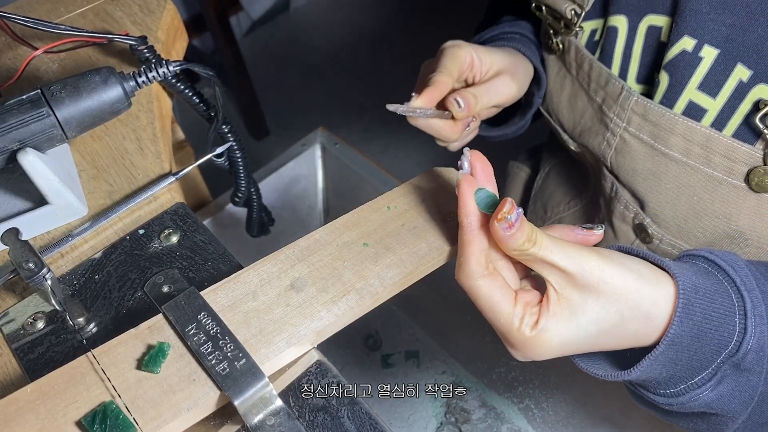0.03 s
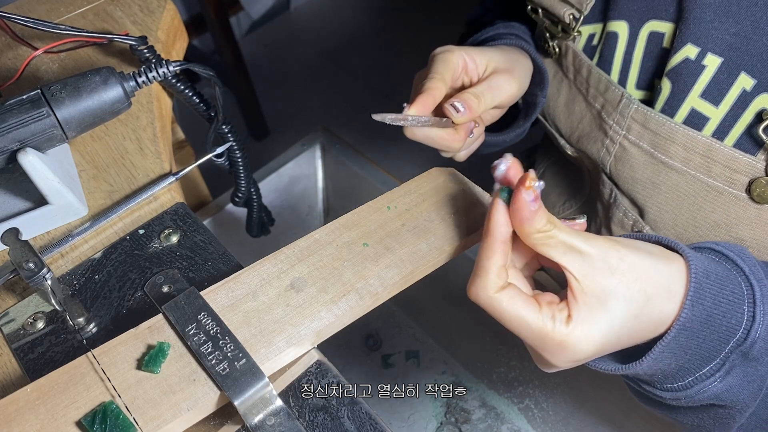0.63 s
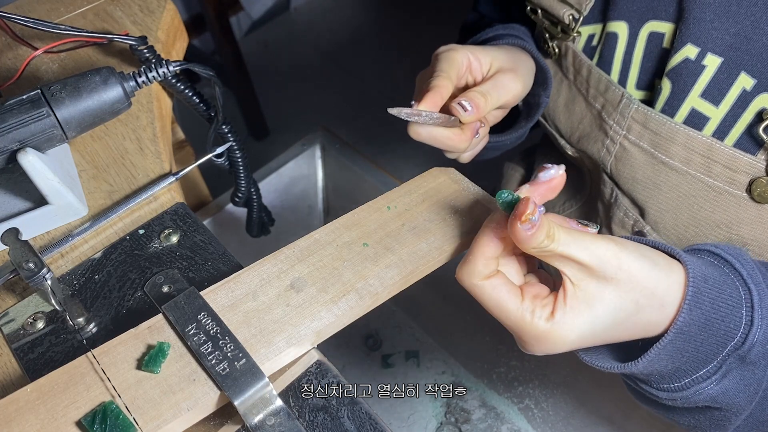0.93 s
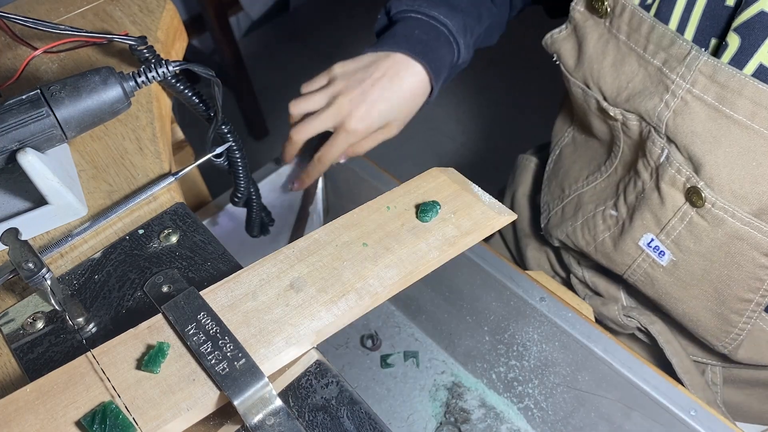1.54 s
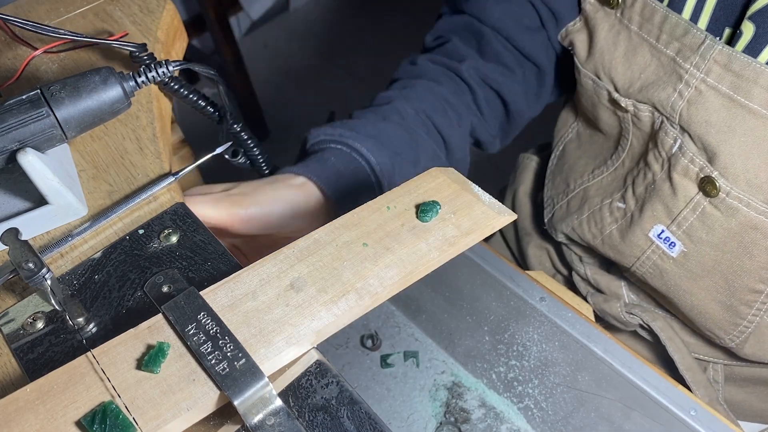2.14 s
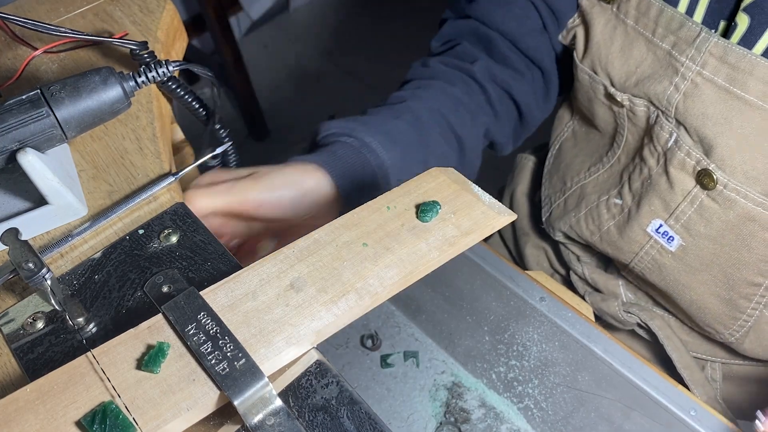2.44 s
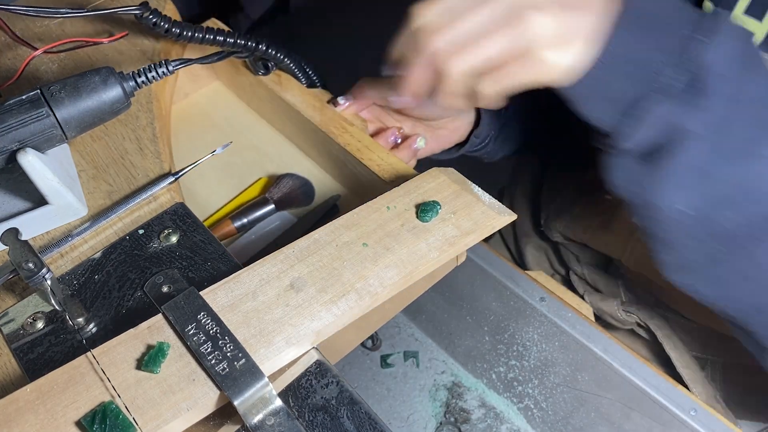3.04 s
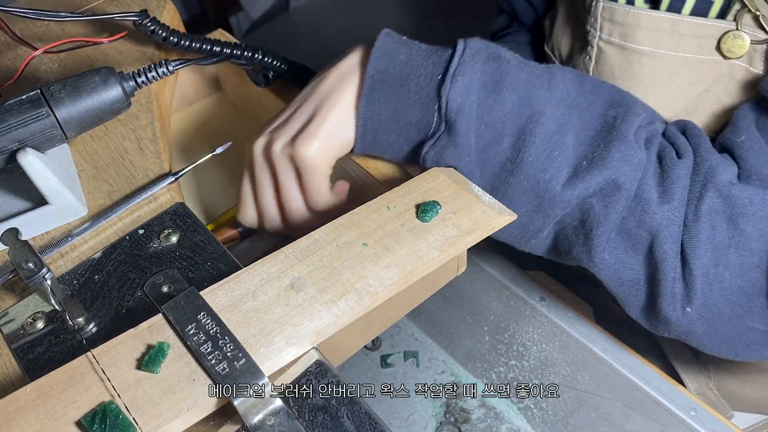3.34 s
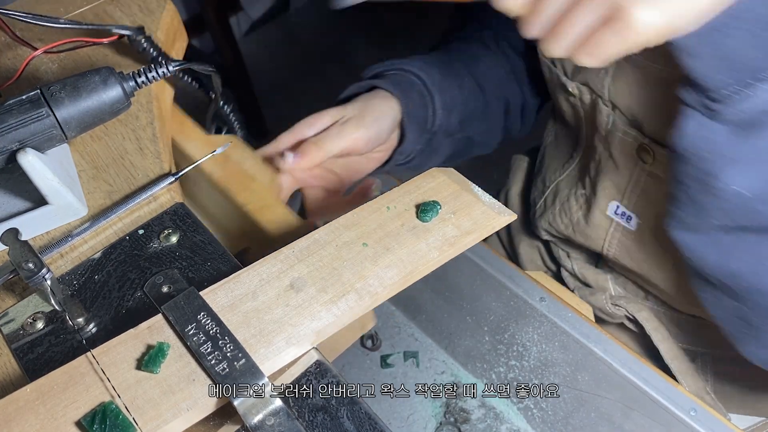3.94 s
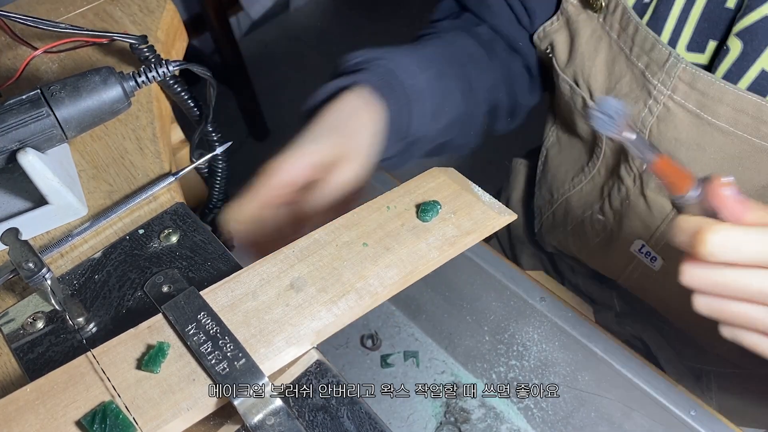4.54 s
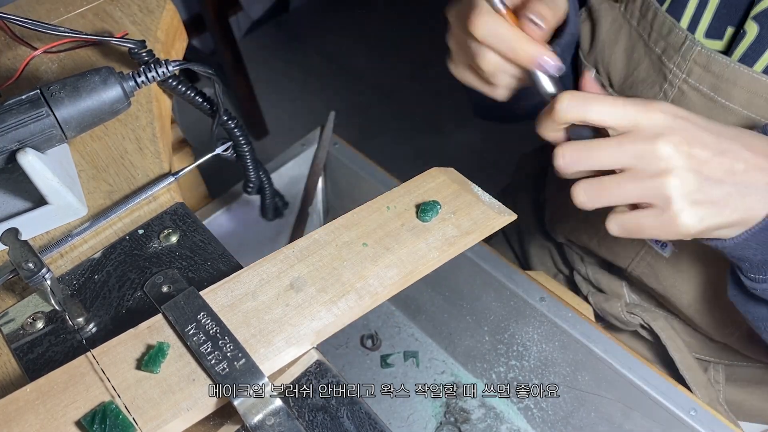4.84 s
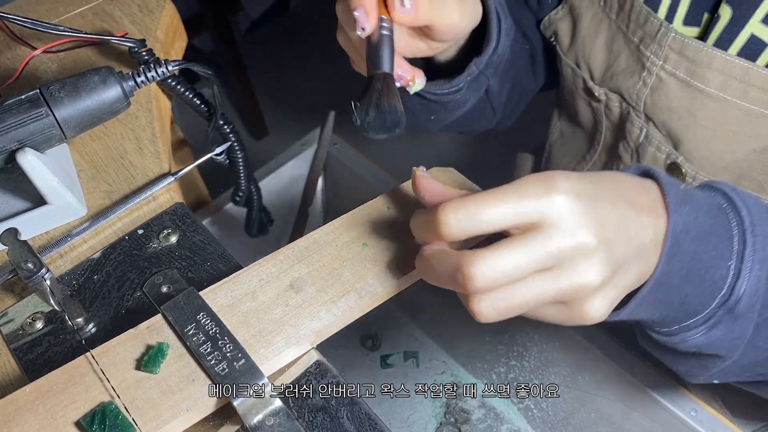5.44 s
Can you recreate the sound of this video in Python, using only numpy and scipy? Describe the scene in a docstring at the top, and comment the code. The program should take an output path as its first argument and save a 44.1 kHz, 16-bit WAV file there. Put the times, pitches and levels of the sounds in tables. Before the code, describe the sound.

Light knocks on a wooden bench, then a wooden drawer rasps open, groans and bumps shut in a quiet workshop.

```python
"""A jeweller's bench in a small, quiet room, heard through two close microphones.
Sleeves rustle over a low rumble. Carving wax is set on the wooden bench pin, and a file is slid
away and dropped. A wooden drawer rasps open: its dry runners catch and slip, which shakes the
box and makes it groan. A brush clinks as it is picked out, the drawer bumps shut, and
fingertips turn the brush."""
import sys
import numpy as np
from scipy import signal
from scipy.fft import rfft, irfft, next_fast_len
from scipy.io import wavfile
from scipy.ndimage import uniform_filter1d, map_coordinates

SR = 44100
rng = np.random.default_rng(int(sys.argv[2]) if len(sys.argv) > 2 else 0)


def pcm_store(signal):
    """Save signal as 16-bit PCM."""
    levels = np.round(np.clip(np.atleast_2d(signal), -1, 1) * 32767)
    wavfile.write(sys.argv[1], SR, levels.astype(np.int16).T)


N = 250488


def amp(db):
    """Turn decibels into a gain."""
    return 10 ** (np.asarray(db) / 20)

def unit(x):
    """Scale a signal to an average power of 1."""
    return x / np.sqrt(np.mean(x ** 2) + 1e-20)

def along(points, hz):
    """Read a curve of (f/Hz, value) points, giving each octave about equal space."""
    f, v = np.transpose(points)
    return np.interp(np.log(hz + 1), np.log(f + 1), v)

def level(rows):
    """Join (t/s, level/dB) points into one level per sample, silent before and after."""
    s, db = np.transpose(rows)
    return np.interp(np.arange(N) / SR, s, db, left=-160, right=-160)

def swell(middle, length, db):
    """A gain that rises and falls smoothly, once."""
    return amp(db) * np.exp(-(2 * (np.arange(N) / SR - middle) / length) ** 2)

def wobble(rate):
    """A smooth curve through `rate` random values a second."""
    return map_coordinates(rng.standard_normal(int(N * rate / SR) + 4), [np.arange(N) * rate / SR])

def add(track, s, sound):
    """Mix a sound in, starting at s seconds."""
    part = track[:, round(s * SR):][:, :sound.shape[-1]]
    part += sound[..., :part.shape[1]]

def filtered(x, response):
    """Multiply each frequency in x by response(hz)."""
    size = next_fast_len(N + SR // 2)
    return irfft(rfft(x, size) * response(np.fft.rfftfreq(size, 1 / SR)), size)[..., :N]

def coloured(x, points):
    """Give x a tone colour: (f/Hz, level/dB) points set the balance of low and high."""
    size = 8192
    gains = unit(amp(along(points, np.fft.rfftfreq(size, 1 / SR))))
    cepstrum = irfft(np.log(gains))
    cepstrum[1:size // 2] *= 2  # folded so the filter never sounds before its input
    cepstrum[size // 2 + 1:] = 0
    impulse = irfft(np.exp(rfft(cepstrum)))
    return signal.fftconvolve(x, impulse[None], axes=1)[:, :N]

def resonant(x, modes):
    """Pass x through resonances, the notes an object favours: (f/Hz, width/Hz, level/dB)."""
    def response(f):
        total = sum((-1) ** k * amp(db) * 1j * f * width / (hz * hz - f * f + 1j * f * width)
                    * hz / (hz + 1j * f) for k, (hz, width, db) in enumerate(modes))
        return total / np.sqrt(np.mean(np.abs(total) ** 2))
    return filtered(x, response)

def rung(force, hz, t60):
    """A force rings one note, which fades by 60 dB in t60 seconds."""
    t = np.arange(SR // 8) / SR
    ring = np.sin(2 * np.pi * hz * t) * amp(-60 * t / t60)
    return signal.fftconvolve(force, ring[None] / np.linalg.norm(ring), axes=1)

def struck(modes, force):
    """A blow rings several fading notes at once: (f/Hz, level/dB, t60/s)."""
    t = np.arange(SR // 4) / SR
    ring = sum(amp(db + rng.normal(0, 0.85) - 60 * t / t60) * np.sin(2 * np.pi * hz * t)
               for hz, db, t60 in modes)
    return signal.fftconvolve(ring[None], force, axes=1)

def wandering(x, drift, rate):
    """Let the pitch stray by about the fraction `drift`, `rate` times a second."""
    n = np.arange(N)
    bend = drift * wobble(rate)
    position = n + np.cumsum(bend - uniform_filter1d(bend, size=SR // 4))
    return np.array([np.interp(position, n, side) for side in x])

def bass_cut(x, low_hz=82):
    """Remove almost all deep bass."""
    return signal.sosfilt(signal.butter(4, low_hz, "highpass", fs=SR, output="sos"), x)

# how much left and right differ: f/Hz, level/dB
STEREO_WIDTH = [(60, -17), (150, -17), (300, -7.5), (470, -4.5), (700, -2), (1200, -1.5), (1550, 1),
                (2000, -2.5), (5000, -2)]
def diffuse(pair):
    """Turn two unrelated signals into left and right: alike in the bass, unlike above."""
    size = pair.shape[1]
    side = irfft(rfft(pair[1]) * amp(along(STEREO_WIDTH, np.fft.rfftfreq(size, 1 / SR))), size)
    return np.array([pair[0] + side, pair[0] - side])

def slips(rate, spread_db, smooth, scatter_t60=0.018, apart=0.65):
    """The force of rubbing: tiny, uneven slips over a smooth rub, scattered sideways by the wood."""
    slipping = rng.random((2, N)) < rate / SR
    size, rub = rng.standard_normal((2, 2, N))
    grains = slipping * amp(spread_db * np.clip(size, -2, 2)) * np.sign(rub)
    near, far = unit(unit(grains) + smooth * rub)
    t = np.arange(SR // 40) / SR
    paths = rng.standard_normal(len(t)) * amp(-60 * t / scatter_t60)
    scattered = unit(signal.fftconvolve(near, paths)[:N])
    return diffuse(np.array([near, unit(scattered + apart * far)]))

def contact(t60, chatter):
    """The force of one blow: a sharp push, then chatter spreading through the wood."""
    t = np.arange(SR // 4) / SR
    rattle = diffuse(rng.standard_normal((2, len(t)))) * amp(-60 * t / t60)
    force = chatter * rattle / np.linalg.norm(rattle[0])
    force[:, 0] += 1
    return force / np.linalg.norm(force[0])

def catches(rows):
    """Noise rings one narrow resonance after another, each swelling briefly."""
    out, t = np.zeros((2, N)), np.arange(SR // 3) / SR
    centre = t.mean()
    for s, length, db, hz, width in rows:
        noise = diffuse(rng.standard_normal((2, len(t))))
        rasp = rung(noise, hz, t60=np.log(1000) / (np.pi * width))[:, :len(t)]
        shape = np.exp(-(2 * (t - centre) / length) ** 2)
        add(out, s - centre, amp(db) * unit(rasp * shape) * np.sqrt(np.mean(shape ** 2)))
    return out


# tone colour of the quiet room: f/Hz, level/dB
ROOM_COLOUR = [(22, -18.5), (40, -17.5), (56, 3.5), (80, -14.5), (110, -10), (170, -22), (250, -27.5),
               (400, -35.5), (950, -44), (1300, -48), (1600, -43), (2100, -52.5), (2900, -50.5),
               (3400, -57), (10000, -60), (15000, -74)]
def room_rumble(level_db=-56.5):
    """The workshop's steady, low rumble."""
    noise = diffuse(rng.standard_normal((2, N)))
    return amp(level_db) * unit(filtered(noise, lambda hz: amp(along(ROOM_COLOUR, hz))))

# how long the echo takes to fade: f/Hz, t60/s
ECHO_FADE = [(100, 0.7), (260, 0.38), (700, 0.33), (2000, 0.3), (6000, 0.29), (14000, 0.21)]
def room_echo(x):
    """The room answers a few milliseconds later, and the bass lingers longest."""
    hz, t, spectrum = signal.stft(rng.standard_normal((2, SR * 2 // 3)), SR, nperseg=256)
    fade = amp(-60 * t / along(ECHO_FADE, hz)[:, None])
    tail = signal.istft(spectrum * fade, SR, nperseg=256)[1]
    tail = diffuse(tail / np.linalg.norm(tail[0]))
    delayed = np.pad(tail, ((0, 0), (200, 0)))
    return signal.fftconvolve(x, delayed, axes=1)[:, :N]

# arm movements, the last as the fingers land on the brush: middle t/s, length/s, level/dB
RUSTLES = [(0.368, 0.18, -77), (1.78, 0.42, -59.5), (2.268, 0.072, -61.5), (3.134, 0.55, -61),
           (3.566, 0.15, -58), (4.936, 0.32, -67.5), (5.204, 0.13, -74.5)]
# tone colour of cloth: f/Hz, level/dB
CLOTH = [(120, -20.5), (280, 4.5), (480, 4.5), (900, -6.5), (1700, -8.5), (2300, -12.5), (3500, -18.5),
         (6000, -22.5), (11000, -22), (16000, -30)]
def sleeves():
    """Cloth brushes on cloth as the arms move, and softly as the fingers land on the brush."""
    rustle = sum(swell(*row) for row in RUSTLES)
    return amp(-1) * coloured(rustle * slips(rate=370, spread_db=2, smooth=0.73), CLOTH)

# how hard the fingers rub the brush handle: t/s, level/dB
FINGER_RUB = [(4.768, -98), (4.778, -72), (4.85, -81), (4.925, -74), (4.944, -68.5), (4.965, -71),
              (4.985, -84.5), (5.05, -94)]
# tone colour of dry skin: f/Hz, level/dB
SKIN = [(300, 3), (900, 7), (1600, 4), (2300, 0), (3500, 1), (5000, -11), (6000, -25), (14000, -33)]
def fingers():
    """Dry fingertips catch in tiny grains as they turn the brush."""
    return coloured(amp(level(FINGER_RUB)) * slips(rate=370, spread_db=2.5, smooth=0.39), SKIN)

# two squeaks, then two notes of a tap: middle t/s, length/s, level/dB, f/Hz, width/Hz
SQUEAKS_AND_TAP = [(.352, 0.041, -75.5, 2946, 13), (.4, 0.044, -77, 1560, 65), (.512, 0.019, -67, 1240, 30),
                   (.53, 0.022, -62.5, 872, 25)]
def squeaks_and_tap():
    """Faint squeaks on the wax, then the brief ring of a soft tap."""
    return catches(SQUEAKS_AND_TAP)

# how hard the file rubs: t/s, level/dB
FILE_RUB = [(1.315, -40), (1.321, -52), (1.359, -48), (1.45, -40.5), (1.485, -37.5), (1.525, -41.5),
            (1.6, -52), (1.68, -94)]
# tone colours of a tool rubbing wood and of its fine scraping: f/Hz, level/dB
TOOL_RUB = [(100, -27), (220, -5), (280, 9.5), (370, -13.5), (470, 1), (850, -0.5), (1200, -11),
            (1600, -4.5), (2000, -25), (3000, -20.5), (9000, -75)]
SCRAPE = [(1200, -22), (2400, -5.5), (3500, -7.5), (5000, -7), (7000, -14), (11000, -16.5), (16000, -21)]
def file_slide():
    """The file is pushed along wood, its teeth lightly scraping."""
    force = amp(level(FILE_RUB)) * slips(rate=2100, spread_db=4.5, smooth=0.25)
    return coloured(force, TOOL_RUB) + amp(-25) * coloured(force, SCRAPE)

# the file landing: t/s, level/dB
DROP = (1.862, -36)
# notes of what rings under it: f/Hz, level/dB, t60/s
LANDING_NOTES = [(320, 9.5, .14), (398, 19, .06), (885, 6.5, .065), (1190, -2.5, 0.17), (1570, 8.5, .04),
                 (1987, 0, 0.17), (2550, -1, .07)]
def file_drop():
    """The dropped file leaves a short, woody ring."""
    out, (s, db) = np.zeros((2, N)), DROP
    add(out, s, amp(db) * struck(LANDING_NOTES, contact(t60=0.004, chatter=0.4)))
    return out

# knocks of wax, file, brush and fingers on the bench, tray and drawer (later dB add to the level):
# t/s, level/dB, crack/dB, tick/dB, chatter t60/s, ring f/Hz, ring/dB, thud/dB
KNOCKS = [(.5, -52, -35, -35, .07, 754, 4.5, -2), (0.832, -52, -24, -30, 0.15, 2120, -4.5, -5),
          (1.093, -22, -7, -11, 0.15, 1000, -4.5, -1), (1.102, -27, -20, -35, .04, 450, 5, -8),
          (1.32, -31, -11, 4.5, .03, 504, 6.5, -4), (1.371, -36.5, -5, -20, 0.076, 980, 5, 4.5),
          (1.469, -24, -14, -25, 0.056, 840, -3, -6), (1.483, -25.5, -19, -28, 0.03, 605, -2, -1),
          (1.540, -25, -9, -14, 0.063, 1140, -6, -4.5), (1.796, -40, -1, -3, 0.029, 2250, -4.5, -12.5),
          (1.862, -19, -0.5, -3, 0.016, 333, 0.5, -17), (1.894, -24.5, -25, -30, 0.016, 163, 7, 4),
          (1.929, -31, -7, 1, 0.032, 457, -5, -4.5), (1.978, -37, -32, -35, 0.028, 180, 7, 0.5),
          (2.041, -48.5, 0.5, -12, 0.036, 2490, -6.5, 0.5), (2.171, -40, -20, -35, .025, 563, 2.5, 0.5),
          (2.832, -33.5, -7, 11, 0.025, 1540, -4.5, -2), (3.258, -21, -9, 0, 0.07, 860, -1.5, -2),
          (3.307, -26, -30, -35, 0.055, 330, 3.5, 1), (3.421, -38.5, 3, -3, 0.057, 890, 0.5, 3),
          (3.539, -48, -10, -28, .04, 1880, -3, -9.5), (3.596, -34.5, -2, -16, 0.075, 520, 3.5, -11),
          (4.64, -60, -2, 6.5, .023, 3580, -1.5, -3), (5.109, -45, -11, 3, 0.019, 217.5, 7.5, -2),
          (5.116, -48, -29, -24, .02, 452, 6, 1.5)]
# resonances of the bench's top and of its frame: f/Hz, width/Hz, level/dB
BENCH_TOP = [(302, 26, 4), (506, 60, 4), (794, 96, 0.5), (1080, 120, -18), (1465, 161.4, -27),
             (2160, 400, -10.5), (2600, 89, -5.5)]
FRAME = [(104, 40, -13), (142, 20, 2.5), (182, 18, 4.5), (250, 50, -7), (293, 30, -5.5)]
# tone colours of a blow on wood, from dull to bright: f/Hz, level/dB
THUD = [(35, -42), (90, -0.5), (170, 1), (280, -1), (420, -19.5), (1000, -67.5), (3000, -110)]
WOOD = [(130, -26.5), (300, 5.5), (500, 5.5), (900, -2), (1600, -11), (2400, -30), (5000, -54.5),
        (10000, -85.5)]
CRACK = [(1000, -20), (2000, -0.5), (2600, -2), (3400, -10.5), (5300, -14.5), (7000, -26.5), (9000, -31),
         (16000, -39)]
def knocks(ring_cycles=9):
    """Knocks on the bench, tray and drawer: all thud, hard ones crack, each spot has its note."""
    body, thud, crack, spot = np.zeros((4, 2, N))
    for s, db, crack_db, _, t60, hz, ring_db, thud_db in KNOCKS:
        force = contact(t60, chatter=2.9)
        add(body, s, amp(db) * force)
        add(thud, s, amp(db + thud_db) * force)
        add(crack, s, amp(db + crack_db) * contact(t60, chatter=3.7))
        add(spot, s, amp(db + ring_db) * rung(force, hz, ring_cycles / hz))
    wood = amp(18) * coloured(body, WOOD) + amp(5) * resonant(body, BENCH_TOP) + amp(16.5) * spot
    low = amp(12.5) * coloured(thud, THUD) + resonant(thud, FRAME)
    return wood + low + amp(15.5) * coloured(crack, CRACK)

# tone colour of a tick: f/Hz, level/dB
TICK = [(2500, -12), (5000, -6), (6700, 4), (9000, 2.5), (11500, -12.5), (16000, -36)]
def ticks():
    """The first touch of every knock is a crisp, dry tick."""
    force = np.zeros((2, N))
    for s, db, _, tick_db, *_ in KNOCKS:
        add(force, s, amp(db + tick_db) * contact(t60=0.027, chatter=0.68))
    return coloured(force, TICK)

# the brush hitting other tools: t/s, level/dB
CLINKS = [(3.259, -37), (3.6653, -33)]
# notes of its handle: f/Hz, level/dB, t60/s
HANDLE_NOTES = [(1504, 8, 0.035), (2896, -1, 0.025), (4850, 8, 0.03), (6700, 3, 0.016), (8800, 2, 0.014),
                (10820, -1, 0.016)]
# its drag over the drawer's bottom and its scuff on the edge: middle t/s, length/s, level/dB
DRAG = (3.364, 0.024, -32.5)
SCUFF = (3.428, .02, -44.5)
def brush():
    """The handle rings at each touch, scrapes the drawer's bottom and scuffs its edge going out."""
    clinks = np.zeros((2, N))
    for s, db in CLINKS:
        add(clinks, s, amp(db - 4) * struck(HANDLE_NOTES, contact(t60=0.038, chatter=0.98)))
        add(clinks, s, amp(db - 9) * contact(t60=0.018, chatter=2.5))
    force = slips(rate=1400, spread_db=-4, smooth=1)
    drag, scuff = swell(*DRAG) * force, swell(*SCUFF) * force
    # a note that rings longer makes a narrower, taller resonance
    modes = [(hz, np.log(1000) / (np.pi * t60), db + 20 * np.log10(t60)) for hz, db, t60 in HANDLE_NOTES]
    handle = amp(-11) * resonant(drag, modes)
    bottom = amp(-6.5) * resonant(drag, PANEL)
    scrape = amp(1) * coloured(drag, TOOL_RUB) + amp(-21) * coloured(drag, SCRAPE)
    edge = coloured(scuff, SCRAPE) + amp(-22) * coloured(scuff, TICK)
    return clinks + handle + bottom + scrape + edge

# the drawer's bumps (thud and ring are added to the level): t/s, level/dB, thud/dB, f/Hz, ring/dB
JOLTS = [(2.371, -18, 13.5, 172, 18), (2.436, -17, 7.5, 202, 19), (2.591, -22.5, 2.5, 1115, 10),
         (2.61, -18.5, 3.5, 540, 14.5), (2.641, -10, -2.5, 710, 20.5), (2.65, -13, 3, 330, 17),
         (2.707, -11.5, -1.5, 700, 12.5), (2.847, -22.5, -1.5, 265, 28.5), (3.662, -13, 3, 296, 22),
         (3.668, -11, 3, 840, 17), (3.675, -15, 8.5, 306, 13), (3.838, -14, 1, 333, 19.5),
         (3.87, -8.5, 2, 720, 11), (3.897, -14, 10.5, 178, 22.5), (4.001, -19, 8, 180, 19),
         (4.054, -20.5, 5.5, 190, 14.5), (4.149, -22.5, 8, 247, 12), (4.287, -28.5, 19.5, 252, 13),
         (4.346, -22.5, 12.5, 180, 23), (4.365, -19.5, 3, 656, 11), (4.394, -21, 13, 850, 8)]
def drawer_jolts(ring_cycles=8):
    """The loose drawer tips and bumps against its frame, each corner with its own note."""
    body, thud, corner = np.zeros((3, 2, N))
    for s, db, thud_db, hz, ring_db in JOLTS:
        force = contact(t60=0.016, chatter=2)
        add(body, s, amp(db) * force)
        add(thud, s, amp(db + thud_db) * force)
        ring = rung(contact(t60=0.017, chatter=0.99), hz, ring_cycles / hz)
        add(corner, s, amp(db + ring_db) * ring)
    wood = amp(10.5) * coloured(body, WOOD) + amp(3.5) * resonant(body, BOX)
    return wood + coloured(thud, THUD) + corner

# groans of the sticking drawer: middle t/s, length/s, level/dB
GROANS = [(2.755, .05, -25), (2.827, 0.068, -15), (3.77, 0.076, -24.5), (3.913, 0.093, -21.5),
          (4.095, 0.026, -26), (4.141, 0.049, -27.5), (4.207, 0.033, -30), (4.324, .035, -30.5),
          (4.394, 0.033, -32.5)]
def drawer_groan(pitch_hz=464, waver=0.022, rough_db=2):
    """Now and then the slipping locks onto the box's main note, most of all as the pull slows."""
    phase = 2 * np.pi * np.cumsum(pitch_hz * (1 + waver * wobble(70))) / SR
    wave = np.sin(phase) + amp(-26) * np.sin(2 * phase)
    roughness = unit(amp(rough_db * wobble(170)))
    return sum(swell(*row) for row in GROANS) * wave * roughness

# brief notes in the drawer's rasp: middle t/s, length/s, level/dB, f/Hz, width/Hz
RASP_NOTES = [(2.44, 0.066, -37, 2867, 110), (2.497, 0.031, -29, 1610, 130), (2.505, .05, -34, 2150, 107),
              (2.525, .035, -41.5, 5100, 200), (2.54, .05, -31, 720, 120), (2.595, 0.029, -38, 2910, 90),
              (2.597, 0.033, -32, 1600, 70), (2.69, 0.039, -22.5, 1620, 60.1),
              (2.745, 0.08, -34.5, 1720, 69.9), (2.768, 0.051, -37.5, 2892, 70),
              (2.795, 0.075, -30, 1552, 49.84), (3.8, 0.038, -33, 1700, 70),
              (3.828, 0.032, -25.5, 845, 40.1), (3.88, 0.035, -31.5, 1144, 91), (3.99, .1, -33, 1059, 35),
              (4.12, 0.067, -42, 2120, 160), (4.245, 0.056, -46.5, 2860, 129),
              (4.375, 0.073, -52, 2900, 161)]
def drawer_catches():
    """The rasping drawer catches on one resonance after another."""
    return catches(RASP_NOTES)

# resonances of the runners: f/Hz, width/Hz, pulled level/dB, pushed level/dB
RUNNERS = [(2230, 150, -14.5, -10.5), (2860, 90, -8, -8.5), (3390, 110, -20.5, -27),
           (4370, 100, -19.5, -16), (4760, 100, -20.5, -17.5), (5030, 300, -10, -16)]
def runners(pull, push, swing_db=5, rate=22):
    """Each resonance of the runners swells and fades on its own as the touching point travels."""
    out = np.zeros((2, N))
    for hz, width, pull_db, push_db in RUNNERS:
        swing = unit(amp(swing_db * wobble(rate)))
        out += swing * resonant(amp(pull_db) * pull + amp(push_db) * push, [(hz, width, 0)])
    return out

# friction as the drawer is pulled out, then pushed in: t/s, level/dB
PULL = [(2.303, -76.5), (2.328, -47.5), (2.423, -42.5), (2.429, -41), (2.571, -35.5), (2.579, -36),
        (2.747, -40), (2.775, -40), (2.87, -61)]
PUSH = [(3.56, -74.5), (3.606, -58), (3.63, -63), (3.65, -51.5), (3.663, -45.5), (3.678, -45.5),
        (3.826, -42.5), (4.038, -43), (4.206, -50.5), (4.393, -49.5), (4.451, -65.5)]
def stroke_gains(response, steady_db=-40.5):
    """A gain for the pull and one for the push, set by friction and by how far the drawer is open."""
    pull_db, push_db, open_db, growth = response
    stroke_times = [PULL[0][0], PULL[-1][0], PUSH[0][0], PUSH[-1][0]]
    opening = np.interp(np.arange(N) / SR, stroke_times, [0, 1, 1, 0])
    strokes = [db + growth * (level(rows) - steady_db) + open_db * opening
               for db, rows in [(pull_db, PULL), (push_db, PUSH)]]
    return uniform_filter1d(amp(strokes), size=300)

# how rub, judder and hiss follow the slide: pull/dB, push/dB, change when open/dB, dB per friction dB
RUB_RESPONSE = (-28.5, -29, 6, 1)
JUDDER_RESPONSE = (-42, -43.5, 13, 1.7)
HISS_RESPONSE = (-40.5, -36.5, -2.5, 1.5252)
# rumble as the drawer rides loose or snug in its frame: t/s, level/dB
DRAWER_RUMBLE = [(2.27, -44.5), (2.36, -43.5), (2.385, -27.5), (2.45, -35.5), (2.51, -44.5), (2.6, -32),
                 (2.67, -37.5), (2.75, -45), (2.87, -40.5), (2.95, -70.5), (3.63, -80), (3.66, -53),
                 (3.74, -42), (3.77, -51), (3.82, -36), (3.9, -30), (4.0, -33.5), (4.2, -43), (4.42, -43),
                 (4.5, -62)]
# resonances of the drawer's box and of its thin bottom panel: f/Hz, width/Hz, level/dB
BOX = [(293.7, 32, -7), (373.6, 19, -2), (452, 26, 0), (562, 60, -9), (617.6, 22, -2.5), (885, 71, -13),
       (1071, 17, -8), (1182.5, 16, -16.5)]
PANEL = [(1411, 76, -18), (1557, 94, 6.5), (1792, 62, 3.5), (2160, 260, -15)]
# tone colours of wood sliding on wood, low and high: f/Hz, level/dB
RUB = [(120, -40.5), (280, -9.5), (450, 1), (750, 1), (1100, -3.5), (1400, -8.5), (2200, -20.5),
       (5000, -65), (10000, -100)]
HISS = [(700, -39), (1300, 3), (2200, 2.5), (3000, -0.5), (3700, -4), (5500, -9), (7500, -4.5),
        (11000, -8.5), (14000, -9.5), (16000, -20)]
def drawer_slide(pull_boom_db=-5, push_boom_db=-1.5, lurch_db=3, shudder_db=2):
    """Dry runners catch and slip, shaking the frame, the box, its bottom panel and themselves."""
    pull_rub, push_rub = stroke_gains(RUB_RESPONSE)
    pull_hiss, push_hiss = stroke_gains(HISS_RESPONSE)
    rub, hiss = pull_rub + push_rub, pull_hiss + push_hiss
    rumble = amp(level(DRAWER_RUMBLE)) * unit(amp(lurch_db * wobble(35)))  # the loose drawer lurches
    judder = stroke_gains(JUDDER_RESPONSE).sum(axis=0) * unit(amp(shudder_db * wobble(40)))
    boom = amp(pull_boom_db) * pull_rub + amp(push_boom_db) * push_rub  # pushing loads the box harder
    boom *= unit(amp(2.1 * wobble(28)))  # the box rocks unevenly
    grip = unit(amp(0.82 * wobble(80)))  # the wood's grain varies the grip
    coarse = grip * slips(rate=800, spread_db=3, smooth=0.39)
    fine = grip * slips(rate=1100, spread_db=2.5, smooth=1)
    frame = resonant(rumble * coarse, FRAME) + amp(-11) * coloured(rumble * fine, THUD)
    box = wandering(resonant(boom * coarse, BOX), drift=0.028, rate=14)
    panel = wandering(resonant(judder * coarse, PANEL), drift=0.018, rate=18)  # its load shifts
    rasp = wandering(runners(pull_hiss * coarse, push_hiss * coarse), drift=0.016, rate=18)
    rubbing = amp(-7.5) * coloured(rub * fine, RUB) + amp(-1.04) * coloured(hiss * fine, HISS)
    return frame + box + amp(-2) * panel + rasp + rubbing


def scene():
    """Everything is within arm's reach in one small room; the groan has the least echo."""
    drawer = bass_cut(drawer_slide() + drawer_jolts()) + drawer_catches()
    handling = bass_cut(knocks(), low_hz=62) + file_slide() + sleeves() + fingers() + squeaks_and_tap()
    # sound, direct level/dB, level sent to the echo/dB
    layers = [(drawer, -0.5, -8.5), (handling, -3, -7), (drawer_groan(), 0, -17.5),
              (brush() + file_drop(), -4.5, -13.5), (ticks(), 0, -7)]
    direct = sum(amp(db) * sound for sound, db, _ in layers)
    echo = room_echo(sum(amp(db) * sound for sound, _, db in layers))
    return direct + echo + room_rumble()

# how much louder the left microphone's own sound is than the right's: f/Hz, level/dB
BALANCE = [(60, -0.5), (170, 2.5), (300, 1.5), (450, -3), (700, 3.5), (950, 1.5), (1250, 2.5), (1700, -1),
           (3800, 5.5), (5300, 3), (7000, 3.5)]
def record(dry, merge_hz=6200, lag_ms=0.1837, own_db=-19, top_hz=15850):
    """Two microphones share most of their treble, one a little late, and lose all above top_hz."""
    sides = np.array([[1], [-1]]) / 2
    apart = lambda hz: 1 / (1 + (hz / merge_hz) ** 24)  # 1 in the bass, 0 in the high treble
    lag = lambda hz: np.exp(2j * np.pi * hz * sides * lag_ms / 1000)
    own = filtered(dry, lambda hz: np.maximum(apart(hz), amp(own_db)) * amp(sides * along(BALANCE, hz)))
    shared = filtered(dry[0], lambda hz: (1 - apart(hz)) * lag(hz))
    return filtered(own - shared, lambda hz: 1 / (1 + (hz / top_hz) ** 160))


dry = scene()
out = record(dry)
pcm_store(out)
```